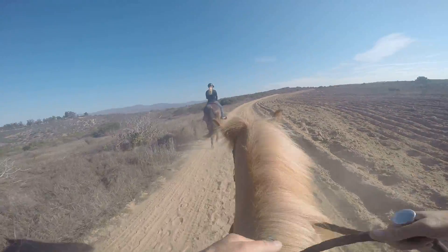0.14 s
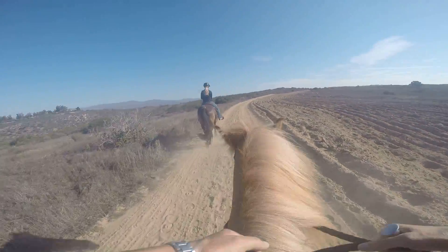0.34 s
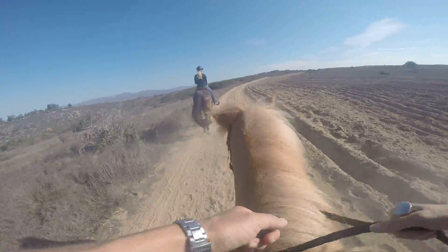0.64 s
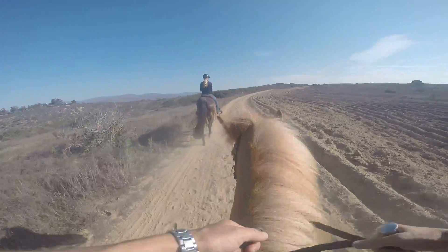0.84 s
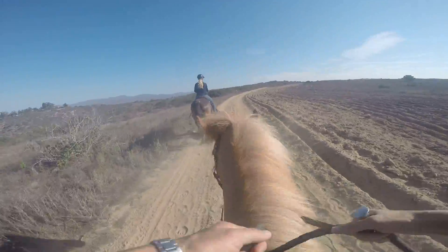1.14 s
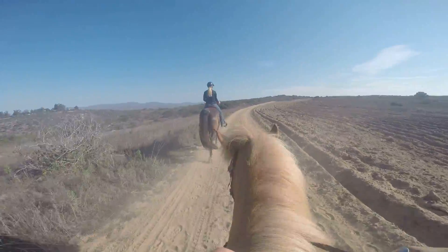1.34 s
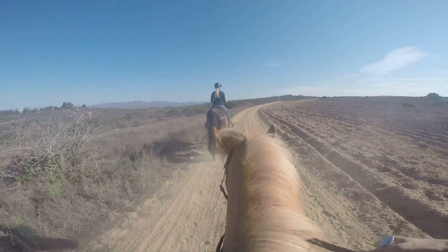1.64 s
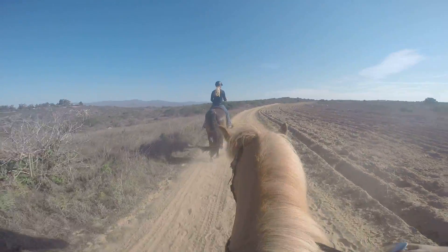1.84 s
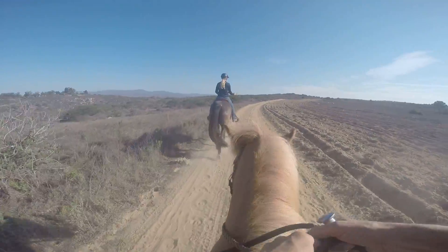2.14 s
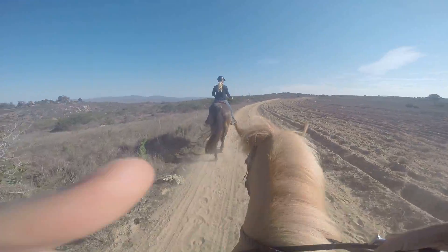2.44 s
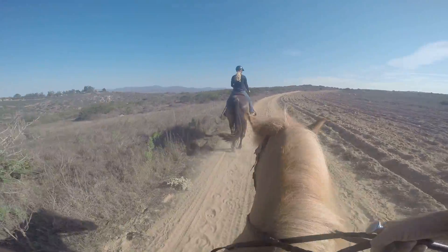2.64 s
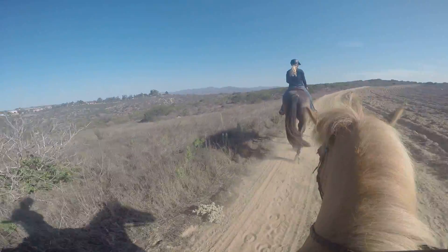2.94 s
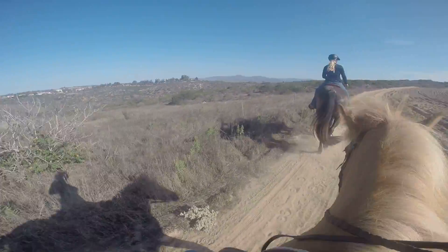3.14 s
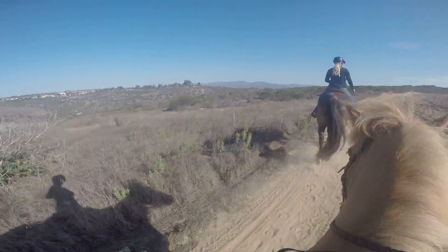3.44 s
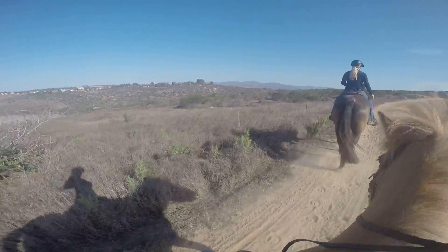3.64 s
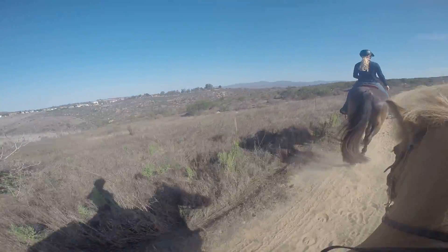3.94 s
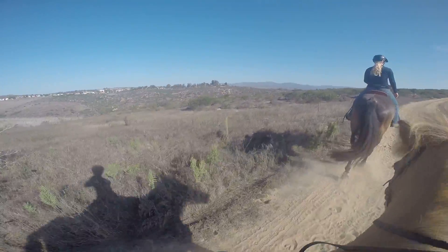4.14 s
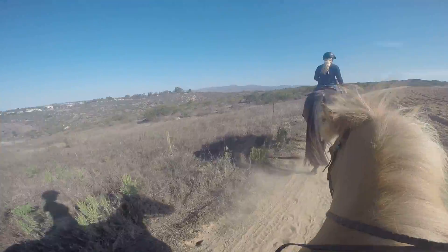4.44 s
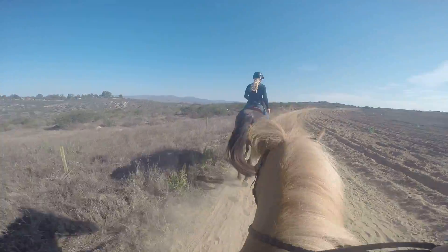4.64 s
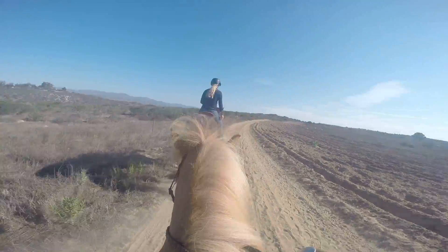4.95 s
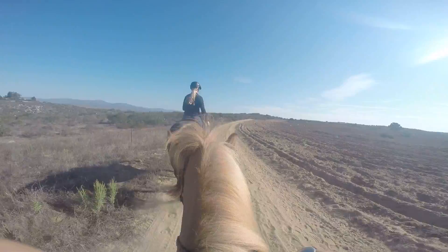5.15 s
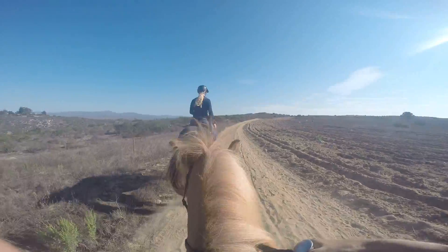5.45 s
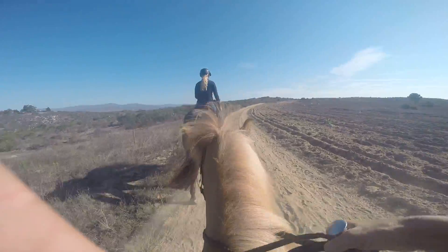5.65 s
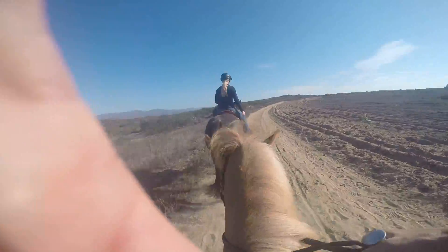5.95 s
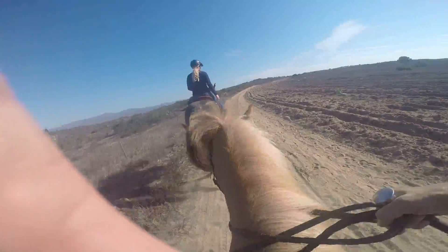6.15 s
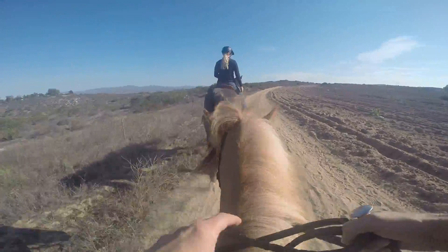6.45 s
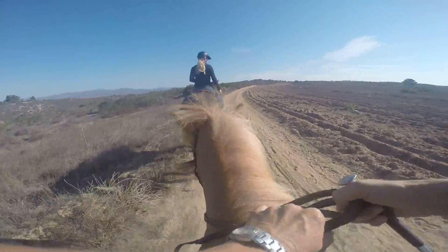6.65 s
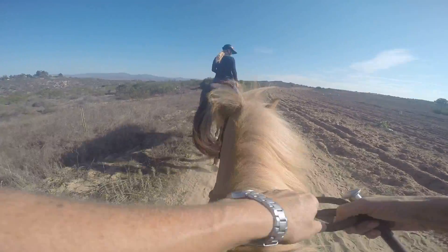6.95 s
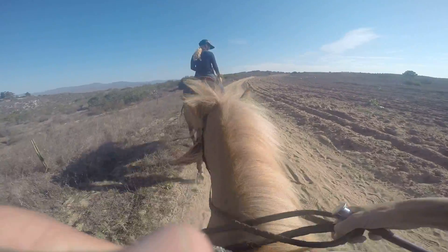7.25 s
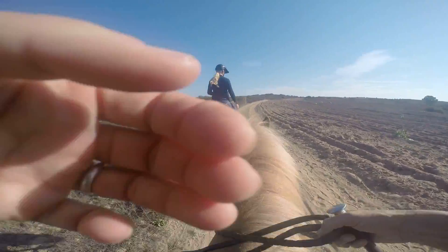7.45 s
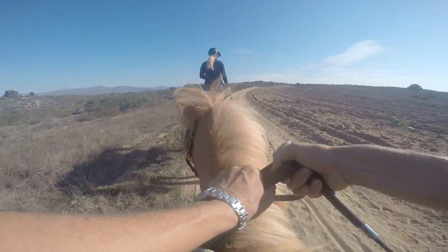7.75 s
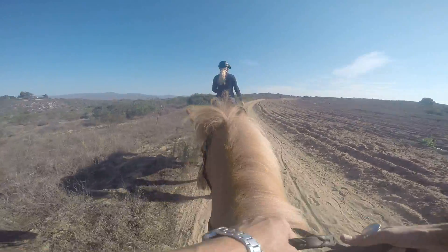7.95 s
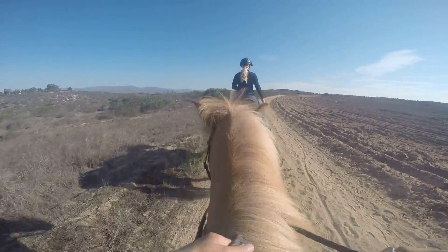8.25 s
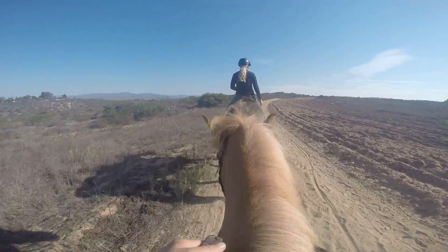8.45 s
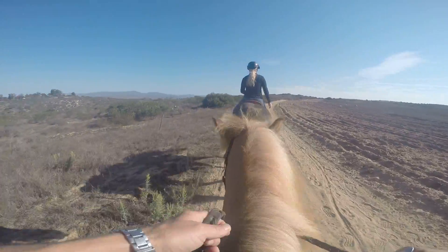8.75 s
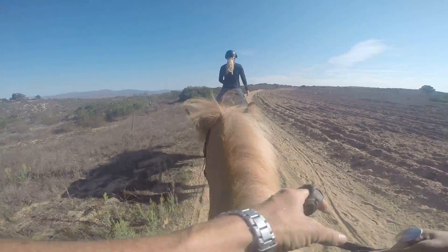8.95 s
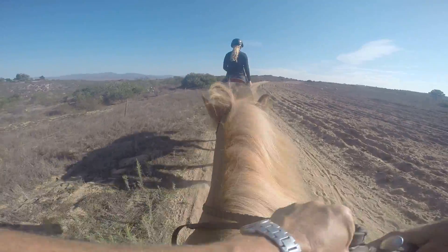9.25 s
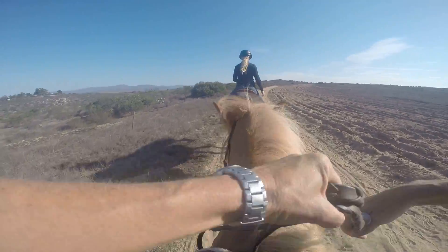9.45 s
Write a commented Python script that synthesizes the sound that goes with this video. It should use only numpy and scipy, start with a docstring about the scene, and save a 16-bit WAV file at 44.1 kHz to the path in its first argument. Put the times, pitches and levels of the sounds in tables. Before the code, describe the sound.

Outdoor ride on a dirt track, microphone sealed in a hard case on the body. Steady muffled hoof pulses and clothing rustle open over low rumble, faint hiss and a very thin electronic whine. Then irregular sharp knocks crack and rattle the case very close, with scrapes between, the background dipping after the loudest. Later, softer steps, two final dull bumps, faint tack clinks and high chirps.

```python
"""Trotting horse heard inside a closed case

A horse trots along a dirt track, heard by a microphone in a closed case strapped to the rider.
Steps are muffled pressure pulses with a shudder; clothes, hands, sleeves and reins rub as shaped noise.
Knocks ring damped case modes over a low thud; small ticks, metal clinks and thin chirps join them.
The loudest knocks duck the rumble, hiss and whine, which climb back within about a second.
"""
import sys
import numpy as np
from scipy import signal
from scipy.fft import rfft, irfft
from scipy.io import wavfile

SR = 44100
rng = np.random.default_rng(int(sys.argv[2]) if len(sys.argv) > 2 else 0)


def output_pcm(signal):
    """Save a mono or channel-first signal as 16-bit PCM at the path in sys.argv[1].

    Samples are clipped to [-1, 1] before scaling.
    """
    pcm = np.clip(np.atleast_2d(signal).T, -1, 1) * 32767
    wavfile.write(sys.argv[1], SR, np.round(pcm).astype(np.int16))


N = 423801
TIME = np.arange(N) / SR
FREQS = np.maximum(np.fft.rfftfreq(N, 1 / SR), 1)

# All levels are relative, before the trims in the functions.
# landings of diagonal hoof pairs: t/s, thump level/dB, landing brush level/dB, rebound brush level/dB
HOOF_LANDINGS = [(0.006, -18, -61, -47.5), (0.27, -7, -39, -42.5), (0.529, -13, -40.5, -44),
                 (0.815, -10.5, -37, -45.5), (1.062, -15, -40.5, -41.5), (1.354, -6.5, -32, -42.5),
                 (1.62, -7, -41.5, -41), (1.912, -13, -37.5, -46.5), (2.158, -9.5, -36, -43.5),
                 (2.453, -24, -48.5, -49), (3.525, -30.5, -45.5, -64), (3.832, -40, -65, -64),
                 (4.114, -27, -72, -51), (4.399, -39, -51.5, -50), (4.693, -20.5, -70, -60),
                 (5.734, -31, -42, -54), (6.019, -39, -63, -59), (6.295, -20, -47, -52.5),
                 (6.537, -20.5, -32, -50.5), (6.815, -16.5, -37.5, -48), (7.095, -16, -37.5, -51.5),
                 (7.635, -31, -44.5, -56), (7.9, -33, -53.5, -68), (8.224, -35, -53.5, -73),
                 (8.507, -34, -52, -68), (8.768, -28.5, -54.5, -67), (9.026, -30, -59, -65),
                 (9.491, -50, -48, -62)]
# shudder spectrum of the mount: f/Hz, spectral level/dB
SHUDDER_SPECTRUM = [(40, -3), (85, 5), (130, 5), (200, -14), (300, -6), (450, -41), (900, -24.5),
                    (3000, -70)]
# hands, sleeves and reins wiping the case: t of the peak/s, length/s, rustle level/dB, hiss re rustle/dB
HAND_WIPES = [(2.673, 0.015, -32.5, -6), (2.78, 0.3, -46.5, -9), (2.906, 0.018, -30.5, 6.5),
              (2.96, 0.2, -47, -19.5), (3.11, 0.059, -46, -29.5), (3.335, 0.15, -45.5, -36),
              (3.626, 0.064, -44, -30), (3.817, 0.083, -39, -27), (3.898, 0.042, -41, -38),
              (3.998, 0.049, -31, -28), (4.045, 0.066, -27, -25), (4.622, 0.086, -29.5, -17),
              (4.73, 0.067, -44.5, -11), (4.93, 0.31, -47.5, -16), (5.135, 0.09, -45.5, -36),
              (5.36, 0.49, -46, -18.5), (5.407, 0.021, -42.5, 1.5), (5.51, 0.031, -50, 16.5),
              (5.815, 0.054, -36.5, -14.5), (5.906, 0.067, -33, -7.5), (6.05, 0.26, -56.5, -9),
              (6.118, 0.025, -36.5, -4), (6.215, 0.054, -45, -9), (6.272, 0.035, -31.5, -8.5),
              (7.05, 1, -54.5, -10.5), (7.373, 0.031, -35.5, -18), (7.415, 0.092, -52.5, 2.5),
              (7.506, 0.02, -30, -7.5), (9.205, 0.081, -44.5, -15.5)]
# dull part of the rubbing: f/Hz, spectral level/dB
RUSTLE_SPECTRUM = [(50, 15), (120, 16.5), (300, 2.5), (550, -2.5), (1100, -4.5), (1900, -4.5),
                   (2700, -10.5), (3500, -9), (4600, -25.5), (7000, -23.5), (8200, -40), (10000, -36.5),
                   (15000, -54)]
# bright part of the rubbing: f/Hz, spectral level/dB
HISS_SPECTRUM = [(800, -19), (2000, -4), (5000, -4), (7000, 6.5), (8500, -7.5), (10300, -2), (12000, -24.5),
                 (15000, -17)]
# air modes inside the case: f/Hz, width/Hz, gain/dB
AIR_MODES = [(1085, 110, 7), (1580, 450, 4.5), (1840, 57, 2.5), (2473, 660, 15), (3500, 450, 8.5),
             (4385, 510, 9.5), (5220, 730, 7), (6570, 1100, 0.5)]
# blows on the case: t/s, ring level/dB, hardness f/Hz, thud level/dB, thud f/Hz, stiff panel snap/dB
CASE_BLOWS = [(2.662, -16, 1210, -35.5, 82.6, 4), (2.668, -9, 900, 0.5, 137, -15),
              (2.675, -17, 1200, -14.5, 173, 8), (2.745, -11, 6700, -9.5, 86, -5.5),
              (2.834, 0, 1920, -20, 187, -1.5), (2.908, -5.5, 1370, -14, 172, -14.5),
              (2.9229, -13.5, 1220, -13.5, 124, 3), (3.0165, -3, 5230, -8.5, 105, -25),
              (3.0725, -18.5, 2490, -9.5, 200, -13), (3.0757, 5, 6240, -13.5, 120.4, 7.5),
              (3.2673, -10.5, 2610, -22.5, 143, 4), (3.7127, -35, 612, -32.5, 162, -0.5),
              (3.7515, -37, 610, -27, 132, 1), (3.951, -25.5, 710, -24, 143, 0),
              (3.9917, -10, 2160, -21.5, 200, -4.5), (4.272, -5, 1550, -12, 120, 8.5),
              (4.418, -39, 610, -24.5, 150, 5), (4.4533, -22, 2420, -24, 157, -2),
              (4.4605, -18.5, 950, -18.5, 150, 3), (4.5272, -18.5, 530, -10, 130, 0),
              (4.6042, -1.5, 1190, -11, 193, 5.5), (4.6469, -4.5, 1150, -5, 214, 14),
              (4.822, 4, 4540, -18.5, 240, 6.5), (4.8392, -19, 1500, -21, 170, 4),
              (4.8473, -13, 1730, -19, 169, 8), (5.0241, -15.5, 1510, -24.5, 277, 5),
              (5.0391, 5, 4200, -14.5, 282, 9), (5.1504, -10, 1530, -18, 183, 3.5),
              (5.2042, -29.5, 3200, -36, 180, 5), (5.3108, -12.5, 1370, -24, 252, 3.5),
              (5.4013, -28, 3360, -25, 134, 7.5), (5.642, -32.5, 910, -19.5, 87.5, 21),
              (5.696, -20.5, 2050, -29, 140, 1), (5.7658, -15, 2750, -28.5, 154, -5),
              (5.9247, -2.5, 1370, -16, 202, 0.5), (5.962, 2, 2270, -9.5, 230, -6.5),
              (6.3102, -23.5, 2100, -32, 108, 5), (6.5476, -20.5, 486, -12.5, 144, -2),
              (6.6585, -25.5, 1490, -41, 185, 0), (7.3623, -18.5, 603, -1, 123, 12),
              (7.4985, -18.5, 1210, -4, 118, 23.5), (9.2216, -23.5, 1620, -32.5, 156, 16)]
# ringing modes of the case: f/Hz, level/dB, t60/s
CASE_MODES = [(322, -22, 0.076), (502, -14, .016), (696, -21, 0.038), (1180, -10, 0.013), (1540, -19, 0.03),
              (1800, -7, 0.0073), (2390, -0.5, 0.0088), (2780, -5, 0.01), (3440, -4.5, 0.0078),
              (4370, -13, 0.0051), (5655, -7, 0.0069), (7730, -20, 0.0039), (8900, -6, 0.0053),
              (10930, -36, 0.0021)]
# bobbing modes of the mount: f/(thud f), level/dB, cycles to fade 60 dB
MOUNT_MODES = [(.4, -6.5, 5.5), (1, -3.5, 7.5), (2.15, -12, 8)]
# ticks of grit and hair on the microphone port: t/s, level/dB
PORT_TICKS = [(2.872, -31), (2.883, -20), (3.625, -25.5), (4.048, -30.5), (4.3442, -20)]
# clinks of small metal tack: t/s, level/dB
TACK_CLINKS = [(8.782, -38.5), (8.95, -31.5), (9.127, -35.5), (9.274, -38), (9.454, -35.5)]
# ringing modes of the tack: f/Hz, level/dB, t60/s
TACK_MODES = [(2740, 7.5, 0.015), (4200, -12, 0.0097), (5560, 11.5, 0.015), (7700, -3.5, 0.031),
              (8200, -20.5, .025)]
# thin high chirps: t of the start/s, length/s, base f at the middle/Hz, level/dB
THIN_CHIRPS = [(0.267, .085, 3360, -53.5), (0.696, .08, 3365, -55), (8.951, 0.11, 3335, -56.5),
               (9.43, 0.094, 3380, -55)]
# partials of a chirp: f/(base f), level/dB
CHIRP_OVERTONES = [(2, -1), (3, -9), (4, -16)]
# rumble and hiss of the background: f/Hz, spectral level/dB
FLOOR_SPECTRUM = [(20, 17.5), (60, 1.5), (150, -2), (300, -7.5), (600, -11.5), (1200, -15.5), (1900, -19),
                  (2500, -17), (4000, -26), (7000, -30.5), (8500, -37), (11000, -34), (13000, -54.5),
                  (16000, -57.5)]
# steady whine of the electronics: f/Hz, rms level/dB
WHINE_TONES = [(5858, -72.5), (11688, -86.5), (11718, -72), (11748, -87), (14626, -80.5)]
# narrow bands of hiss around the whine: f/Hz, width/Hz, gain over the floor/dB
WHINE_HALO = [(5850, 160, 8.5), (11400, 150, 10.5), (11720, 120, 7), (14630, 160, 12)]

# clothes brush the case as the rider sinks into each landing
BRUSH_LEAD_S, BRUSH_LENGTH_S, BRUSH_HISS_DB = 0.018, 0.041, -13.5
# and slide back more slowly as the rider is thrown up again
REBOUND_LAG_S, REBOUND_LENGTH_S, REBOUND_HISS_DB = 0.087, 0.1, -16.5
RISE_SHARE = 0.6   # part of any slide spent speeding up
# shudder: level at a firm brush, dB per dB of brush, and the firm brush itself
SHUDDER_DB, SHUDDER_FOLLOWS, FIRM_BRUSH_DB = -33.5, 1.22, -38
FLOOR_DB, CUTOFF_HZ = -43, 15400


def from_db(db):
    """Definition of level: 20 dB is a tenfold amplitude ratio."""
    return 10 ** (np.asarray(db) / 20)


def peak_one(x):
    """Normalisation: the largest excursion becomes 1."""
    return x / (np.abs(x).max() + 1e-12)


def add(track, s, sound):
    """Superposition: a sound adds to the track from time s on."""
    at = int(round(s * SR))
    part = sound[max(-at, 0):N - at]
    start = max(at, 0)
    track[start:start + len(part)] += part


def filtered(x, hz, kind, order=2):
    """Causal linear filtering with a Butterworth response."""
    sos = signal.butter(order, np.clip(hz, 10, .45 * SR), kind, fs=SR, output="sos")
    return signal.sosfilt(sos, x)


def colour(points):
    """Spectral envelope: gain interpolated in dB over log frequency."""
    hz, db = np.transpose(points)
    return from_db(np.interp(np.log(FREQS), np.log(hz), db))


def bump(hz, width_hz):
    """Lorentzian power response of one resonance."""
    return 1 / (1 + (2 * (FREQS - hz) / width_hz) ** 2)


def shaped(x, gain):
    """Linear filtering by spectral multiplication, normalised to rms 1."""
    y = irfft(rfft(x) * gain, N)
    return y / y.std()


def noise(gain):
    """Gaussian noise coloured by a spectral gain, with rms 1."""
    return shaped(rng.standard_normal(N), gain)


def struck(modes, t):
    """Modal superposition: spot and grip shift the strength and pitch of each damped mode."""
    chance_db = rng.normal(0, 2.5, len(modes))
    detune = np.exp(rng.normal(0, .03, len(modes)))
    total = 0
    for (hz, db, t60), luck, shift in zip(modes, chance_db, detune):
        decay = from_db(db + luck - 60 * t / t60)
        total = total + decay * np.sin(2 * np.pi * hz * shift * t)
    return total


def hooves(press_s=0.0074, release_s=0.0061, lead_s=0.022, lead_width_s=0.0066, lead_share=0.48,
           squash=0.97, thump_db=-1, shudder_s=0.023, shudder_lead_s=0.015):
    """Pressure follows the rate of shove: two opposed pulses per landing, over a mount shudder."""
    thumps, shudder = np.zeros(N), np.zeros(N)
    t = np.arange(-SR // 8, SR // 8) / SR
    for s, db, brush_db, _ in HOOF_LANDINGS:
        lead = lead_s * np.exp(rng.normal(0, .1))
        first = (t + lead) / lead_width_s
        second = t / np.where(t < 0, press_s, release_s)   # it lets go faster than it loads
        shove = np.exp(-second ** 2 / 2) - lead_share * np.exp(-first ** 2 / 2)
        pressure = np.tanh(squash * peak_one(np.gradient(shove)))   # the padding stiffens
        add(thumps, s + t[0], from_db(db + thump_db) * peak_one(pressure))
        # the drag of the clothes sets the shudder, which peaks just before the landing time
        mount_db = SHUDDER_DB + SHUDDER_FOLLOWS * (brush_db - FIRM_BRUSH_DB)
        swell = np.exp(-((t + shudder_lead_s) / shudder_s) ** 2 / 2)
        add(shudder, s + t[0], from_db(mount_db) * swell)
    return thumps + shudder * noise(colour(SHUDDER_SPECTRUM))


def slides():
    """Sliding contacts: a brush and a rebound per landing, and the wipes (columns of HAND_WIPES)."""
    brushes = [(s - BRUSH_LEAD_S, BRUSH_LENGTH_S, db, BRUSH_HISS_DB)
               for s, _, db, _ in HOOF_LANDINGS]
    rebounds = [(s + REBOUND_LAG_S, REBOUND_LENGTH_S, db, REBOUND_HISS_DB)
                for s, _, _, db in HOOF_LANDINGS]
    return brushes + rebounds + list(HAND_WIPES)


def rubs(grain_db=6.0, stick_db=3.0, stick_hz=90, rustle_db=0, hiss_db=-1, taper=0.94,
         fizz=11.0, fizz_hz=11000):
    """Stick-slip friction: dense fibre slips swell with each slide, coloured by the air modes."""
    rustle, hiss = np.zeros(N), np.zeros(N)
    for s, length, db, bright_db in slides():
        rise, fall = RISE_SHARE * length, (1 - RISE_SHARE) * length
        t = np.arange(-int(2 * rise * SR), int(2 * fall * SR)) / SR
        swell = np.exp(-taper * (t / np.where(t < 0, rise, fall)) ** 2)
        add(rustle, s - 2 * rise, from_db(db + rustle_db) * swell)
        add(hiss, s - 2 * rise, from_db(db + bright_db + hiss_db) * swell)
    grain = from_db(grain_db * rng.standard_normal((2, N)))
    slips = rng.standard_normal((2, N)) * grain
    sticking = from_db(stick_db * noise(bump(0, stick_hz)))
    cavity = from_db(sum(db * bump(hz, width) for hz, width, db in AIR_MODES))
    dull = rustle * shaped(slips[0], colour(RUSTLE_SPECTRUM) * cavity)
    bright = hiss * shaped(slips[1], colour(HISS_SPECTRUM) * cavity)
    # squaring leaves the very top to the slides with the strongest hiss
    sizzle = fizz * hiss ** 2 * shaped(slips[0], bump(fizz_hz, fizz_hz / 2))
    return sticking * (dull + bright + sizzle)


def knocks(chatter_s=0.001174, chatter=1.0, crack=1.0, crack_t60=0.0059, crack_hz=5500, thin=0.27,
           ring_db=0, top_hz=11000, door_hz=2550, door_width_hz=550):
    """Impact excitation: the case cracks, rings and chatters once; soft blows are duller, hard ones thinner."""
    out, t = np.zeros(N), np.arange(SR // 16) / SR
    for s, db, hard_hz, _, _, snap_db in CASE_BLOWS:
        # the spot that is hit decides how strongly the stiffest panel snaps
        modes = []
        for hz, level, t60 in CASE_MODES:
            nearness = np.exp(-((hz - door_hz) / door_width_hz) ** 2 / 2)
            modes.append((hz, level + snap_db * nearness, t60))
        bursts = rng.standard_normal((2, len(t))) * from_db(-60 * t / crack_t60)
        cracks = filtered(bursts, crack_hz, "low", order=1)
        first, second = (struck(modes, t) + crack * burst for burst in cracks)
        delay = chatter_s * rng.uniform(0.654, 1.49)
        again = np.interp(t - delay, t, second, left=0)
        ring = filtered(first + chatter * again, hard_hz, "low")
        ring = filtered(ring, thin * hard_hz, "high", order=1)
        add(out, s, from_db(db + ring_db) * peak_one(ring))
    return filtered(out, top_hz, "low")


def thuds(level_db=-1, soft_hz=750):
    """Mass on a spring: each blow also sets the case bobbing on its mount and strap."""
    out, t = np.zeros(N), np.arange(SR // 5) / SR
    for s, _, _, thud_db, hz, _ in CASE_BLOWS:
        bob = np.zeros(len(t))
        for k, (share, mode_db, cycles) in enumerate(MOUNT_MODES):
            mode_hz = share * hz
            bob += (-1) ** k * struck([(mode_hz, mode_db, cycles / mode_hz)], t)   # alternating sign
        add(out, s, from_db(thud_db + level_db) * peak_one(filtered(bob, soft_hz, "low")))
    return out


def ticks(t60=0.0066, low_hz=3200, high_hz=11500):
    """Broadband impulses: flicks at the port, too light to ring the case, are short noise bursts."""
    out, t = np.zeros(N), np.arange(SR // 40) / SR
    for s, db in PORT_TICKS:
        snap = rng.standard_normal(len(t)) * from_db(-60 * t / t60)
        add(out, s, from_db(db) * peak_one(filtered(snap, [low_hz, high_hz], "band")))
    return out


def clinks(level_db=-1, scratch=1.7, scratch_t60=0.021):
    """Modal ringing of small metal parts that touch, with a scratch of decaying band noise."""
    out, t = np.zeros(N), np.arange(SR // 10) / SR
    for s, db in TACK_CLINKS:
        touch = filtered(rng.standard_normal(len(t)), [2200, 8500], "band")
        touch = touch * from_db(-60 * t / scratch_t60)
        add(out, s, from_db(db + level_db) * peak_one(struck(TACK_MODES, t) + scratch * touch))
    return out


def chirps(sag=.012, waver=.002, level_db=-2):
    """Frequency modulation: faint overtones of an absent base sag slightly in the middle."""
    out = np.zeros(N)
    for s, length, hz, db in THIN_CHIRPS:
        arch = np.sin(np.linspace(0, np.pi, int(length * SR))).clip(0)
        pitch = hz * (1 + sag * (1 - arch) + waver * rng.standard_normal(len(arch)))
        phase = 2 * np.pi * np.cumsum(pitch) / SR
        tone = sum(from_db(db + level_db + part_db) * np.sin(round(k) * phase)
                   for k, part_db in CHIRP_OVERTONES)
        add(out, s, np.sqrt(arch) * tone)
    return out


def background():
    """Stationary noise and tones: ride rumble, hiss and the whine of the electronics."""
    whine = sum(np.sqrt(2) * from_db(db) * np.sin(2 * np.pi * (hz * TIME + rng.random()))
                for hz, db in WHINE_TONES)
    halo = from_db(sum(db * bump(hz, width) for hz, width, db in WHINE_HALO))
    return from_db(FLOOR_DB) * noise(colour(FLOOR_SPECTRUM) * halo) + whine


def ducking(x, threshold_db=-1.5, depth=2.7, most_db=18, release_db_per_s=16):
    """Gain reduction: it drops at once when x passes the threshold and climbs back steadily in dB."""
    excess_db = 20 * np.log10(np.abs(x) + 1e-9) - threshold_db
    over = np.clip(depth * excess_db, 0, most_db)
    climb = release_db_per_s * TIME
    return from_db(climb - np.maximum.accumulate(over + climb))


def scene():
    """Superposition of all sources at one microphone; the ringing knocks duck the background."""
    blows = knocks()
    handling = rubs() + blows + thuds() + ticks()
    small_sounds = clinks() + chirps()
    return (hooves() + handling + small_sounds + ducking(blows) * background())[None]


def record(dry):
    """Saturation and band limiting: high peaks bend towards full scale and the top is cut."""
    clipped = dry / (1 + dry ** 8) ** (1 / 8)
    top_cut = signal.ellip(10, .1, 80, CUTOFF_HZ, fs=SR, output="sos")   # ripple, stopband in dB
    return signal.sosfilt(top_cut, .95 * clipped)


dry = scene()
out = record(dry)
output_pcm(out)
```